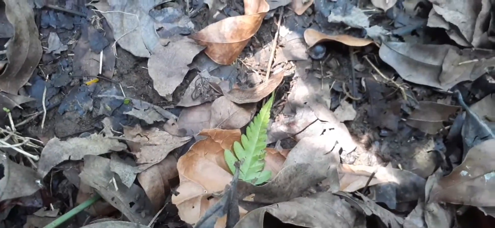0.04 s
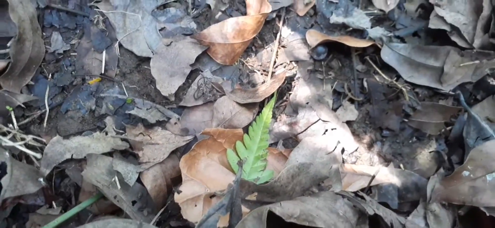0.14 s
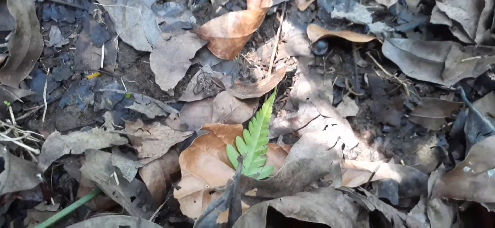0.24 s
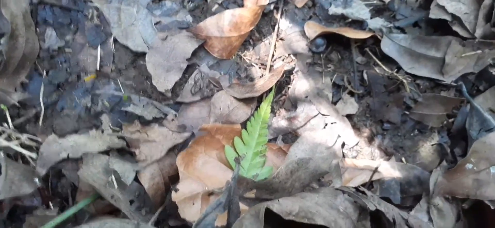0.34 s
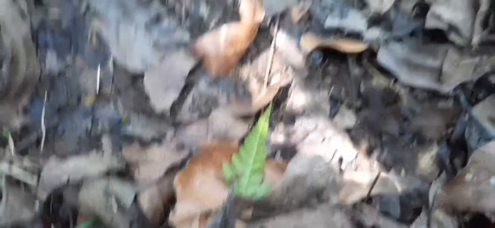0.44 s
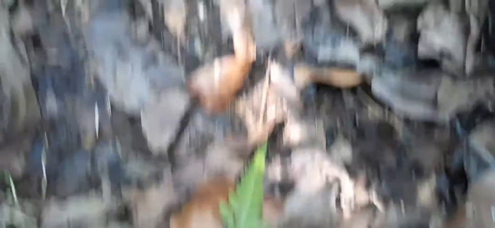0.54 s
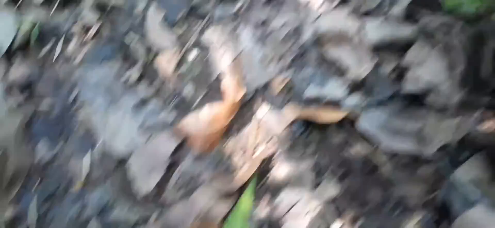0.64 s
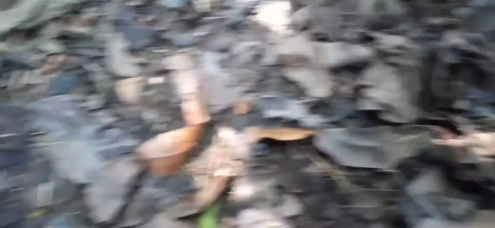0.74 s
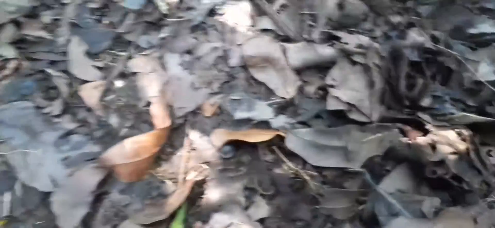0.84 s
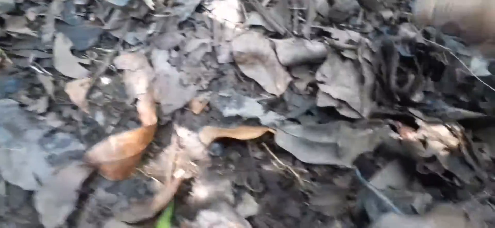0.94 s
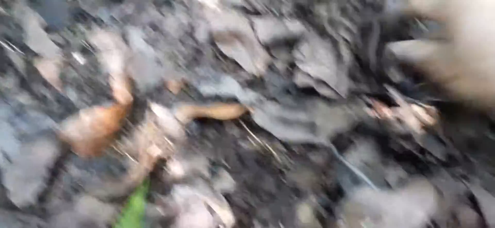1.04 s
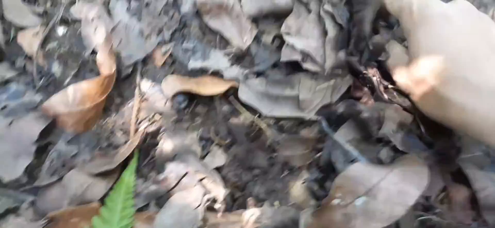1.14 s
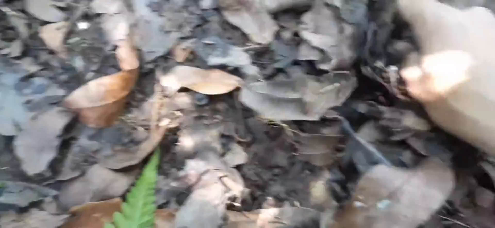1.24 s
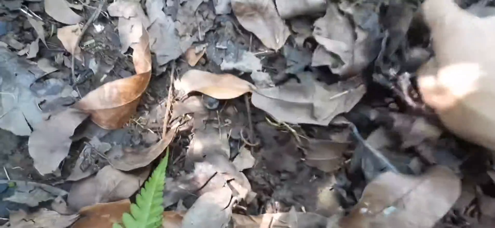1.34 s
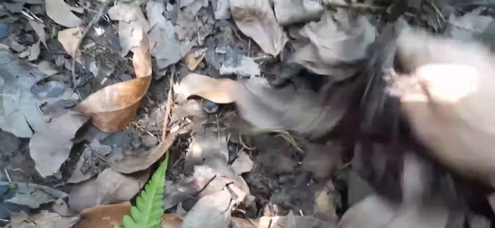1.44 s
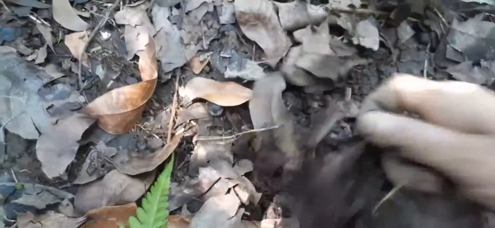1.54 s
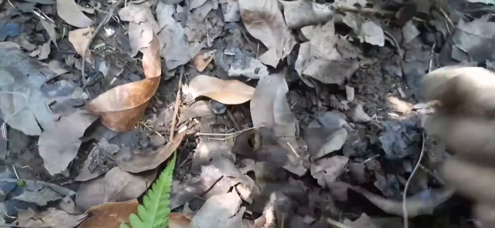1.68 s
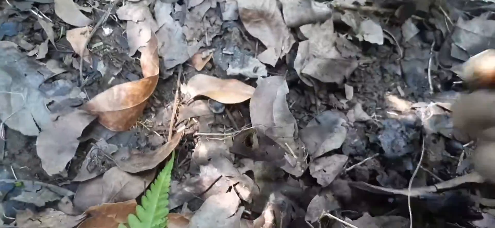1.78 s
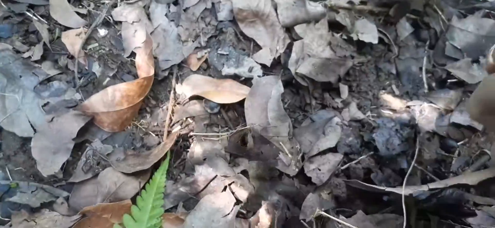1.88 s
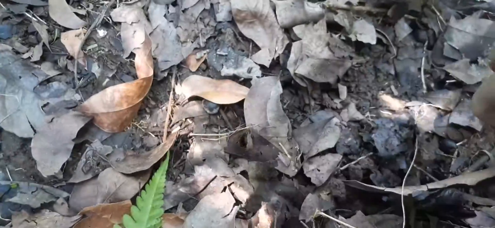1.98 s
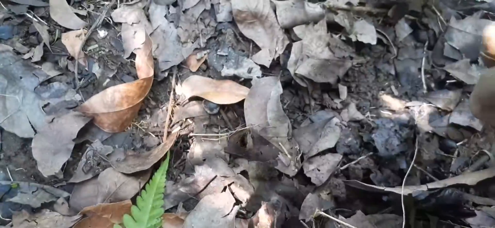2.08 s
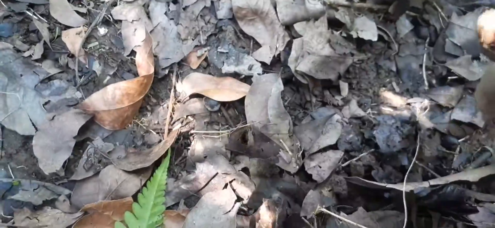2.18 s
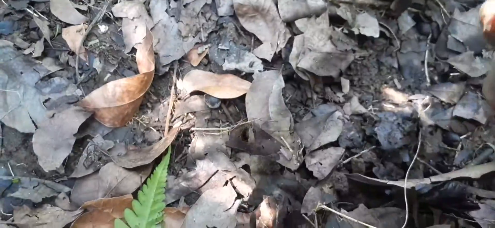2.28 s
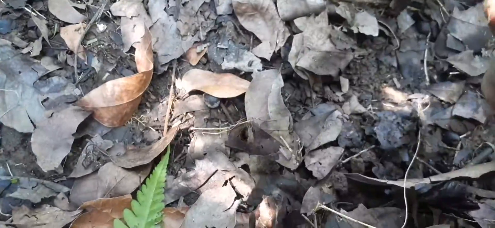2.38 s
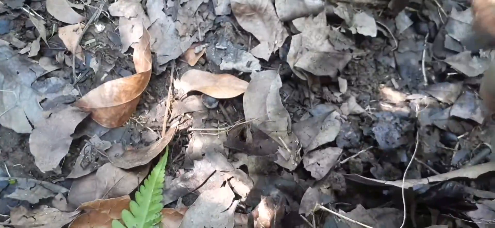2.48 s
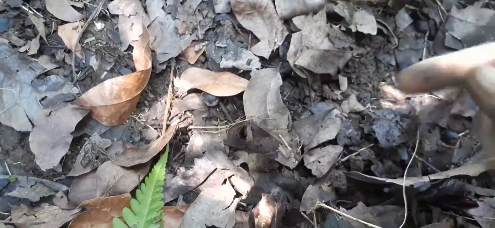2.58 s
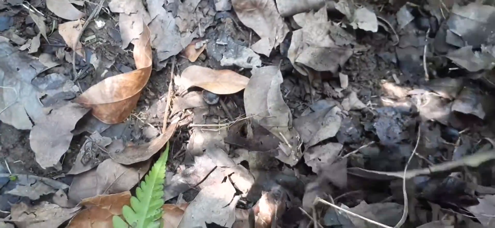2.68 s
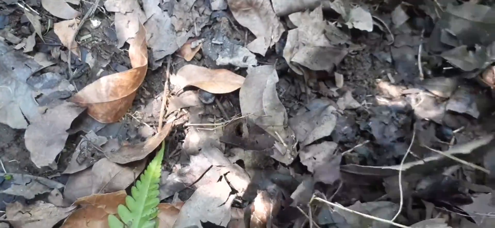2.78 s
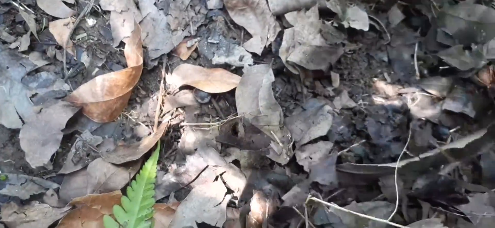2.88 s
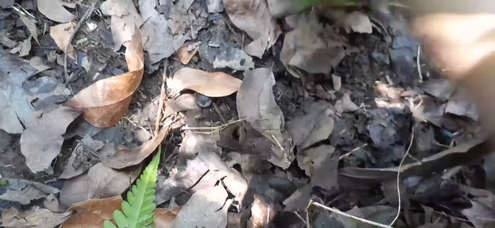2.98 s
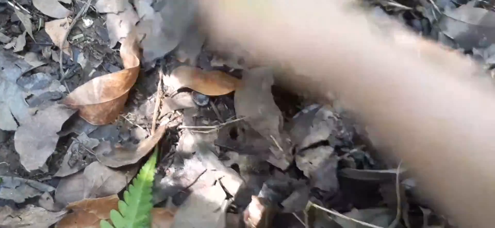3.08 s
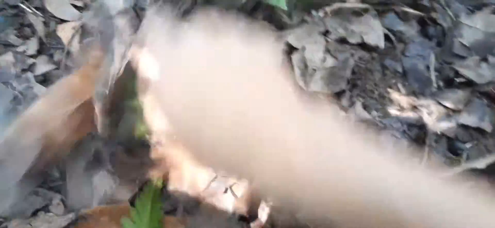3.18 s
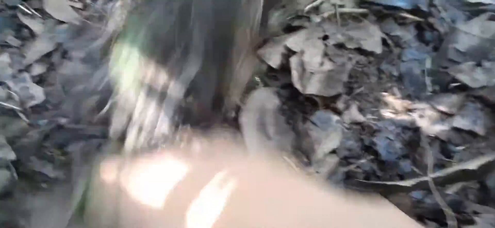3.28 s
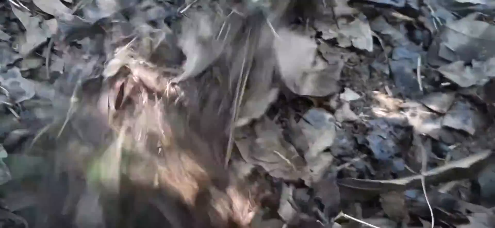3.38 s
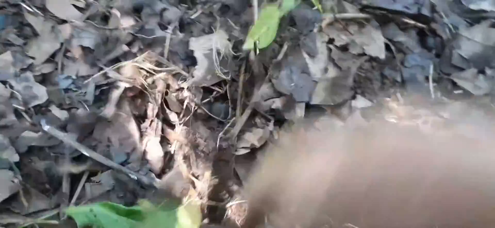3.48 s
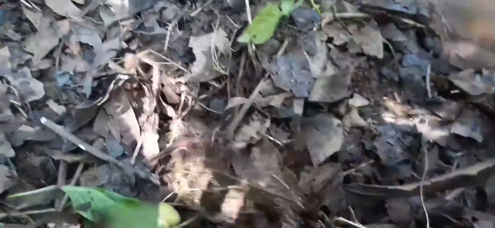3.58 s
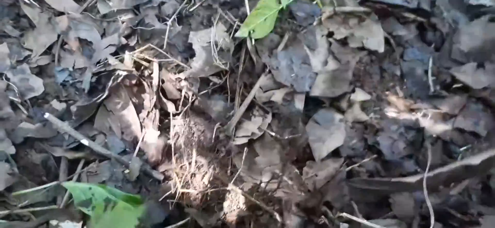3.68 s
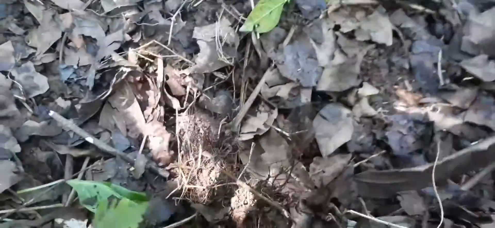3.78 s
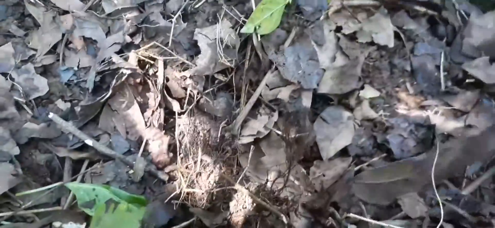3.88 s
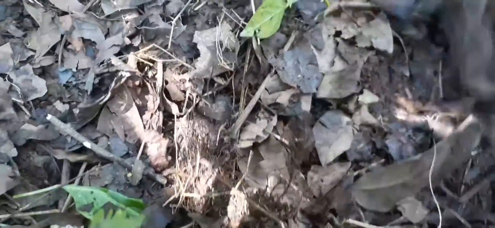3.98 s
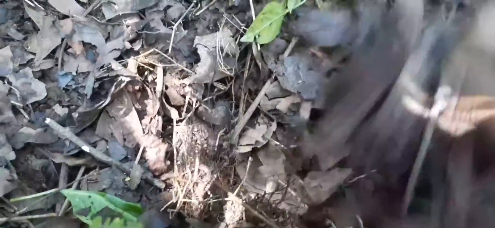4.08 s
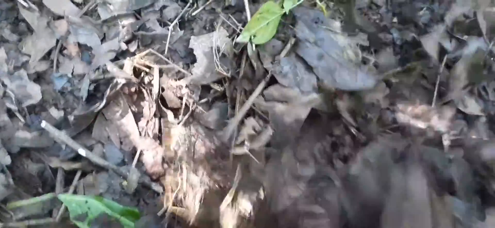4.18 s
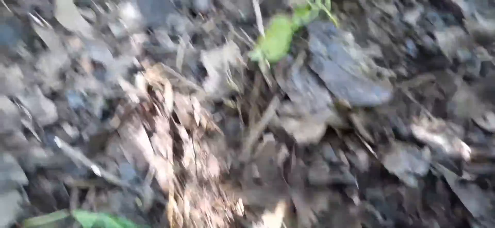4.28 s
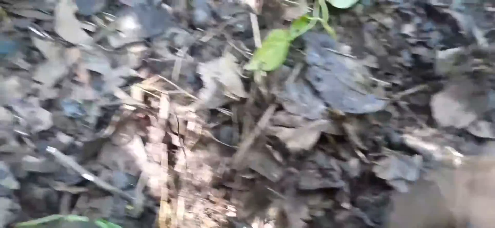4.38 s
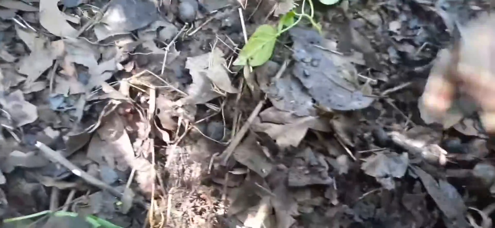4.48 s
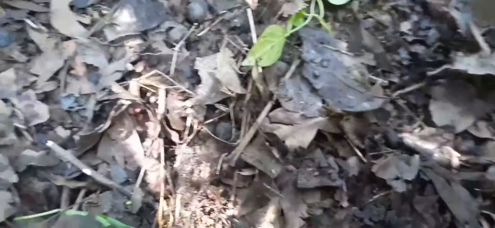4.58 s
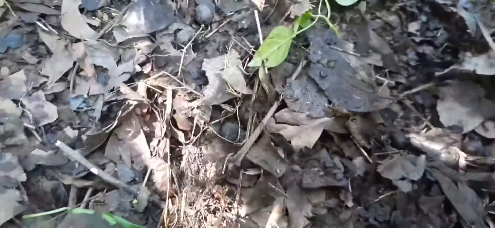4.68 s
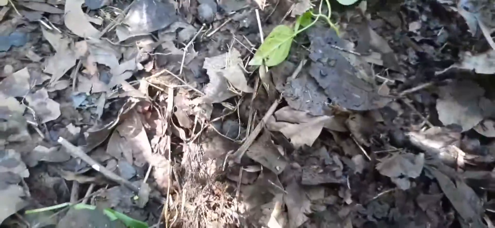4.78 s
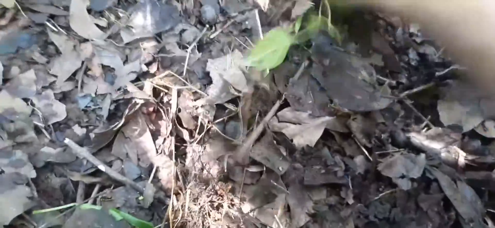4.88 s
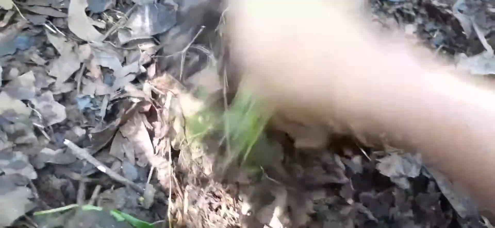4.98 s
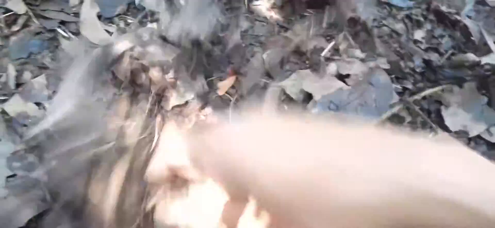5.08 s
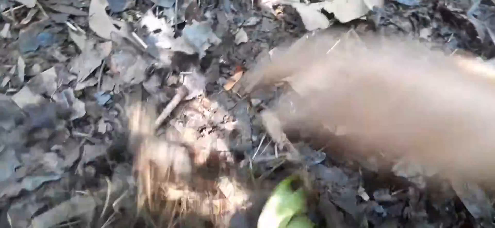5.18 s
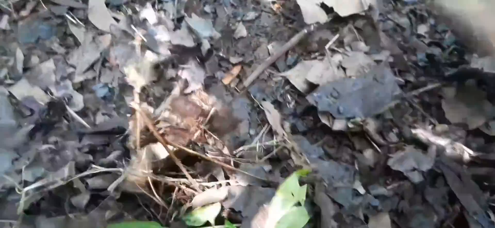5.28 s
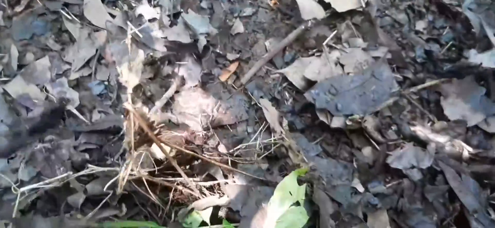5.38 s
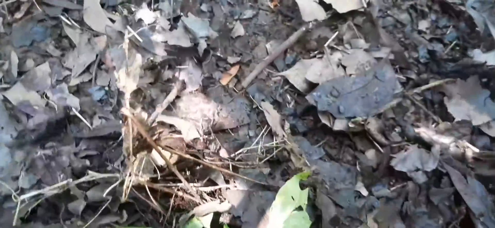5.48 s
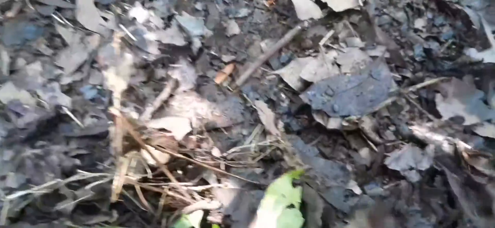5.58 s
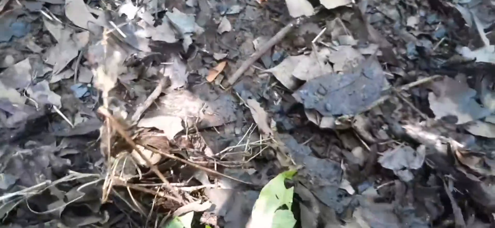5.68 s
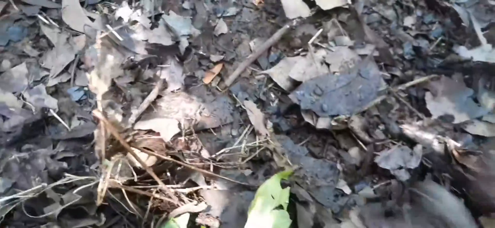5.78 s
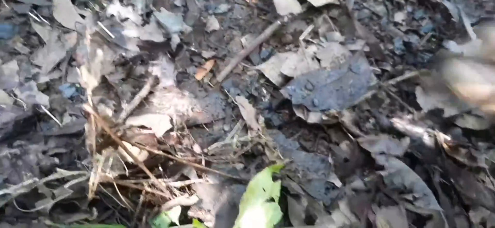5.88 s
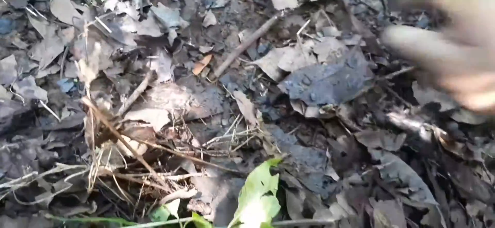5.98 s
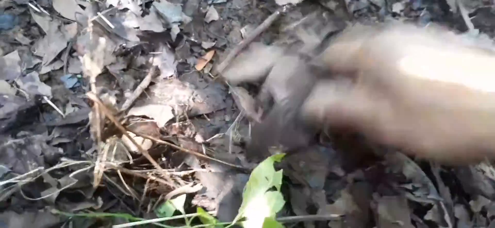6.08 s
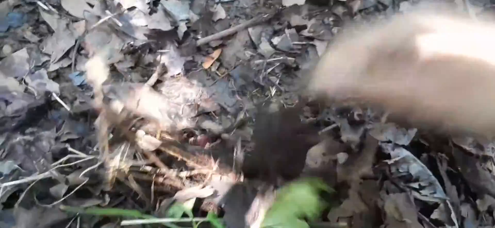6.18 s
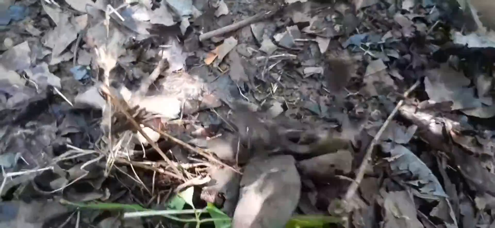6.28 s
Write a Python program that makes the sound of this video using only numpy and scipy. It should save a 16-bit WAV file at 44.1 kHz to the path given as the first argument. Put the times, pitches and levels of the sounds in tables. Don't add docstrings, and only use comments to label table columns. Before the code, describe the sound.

Outdoors, close in stereo, a hand works through dry leaf litter. A crackling stroke is already under way and stops around 0.2 s, with small leaf pops; a short light pull follows at 0.6 s and a soft slow one near 1.1 s. A harder crunching rake runs from 1.4 to 1.7 s, then a few ticks settle into near quiet. A brief touch clicks at 2.7 s. From about 3.0 to 3.6 s comes the loudest, deepest rake, dense crunch leaning left with a slight low air puff. Double strokes fill 3.8 to 4.4 s, with sharp snaps. After a lull, a sideways pull rustles at 4.9 to 5.2 s, a softer scrape at 5.5 to 5.9 s, and a final rummage starts with very sharp cracks at 6.1 s. Faint traffic rumble, a distant engine drone climbing later, and high insect hiss lie underneath.

```python
import sys
import numpy as np
from scipy import signal
from scipy.io import wavfile

SR = 44100
rng = np.random.default_rng(int(sys.argv[2]) if len(sys.argv) > 2 else 0)


def dump(signal):
    limited = np.clip(np.atleast_2d(signal).T, -1, 1)
    pcm = np.round(limited * 32767).astype(np.int16)
    wavfile.write(sys.argv[1], SR, pcm)


def ratio_of_db(decibels):
    return 10 ** (np.asarray(decibels, float) / 20)


N = 279572

# f/Hz, density/dB per Hz
AIR_SPECTRUM = [(25, -26), (45, -4), (80, -4), (130, -6.5), (220, -11.5), (300, -23.5), (420, -30),
                (1000, -38), (2500, -38.5), (5000, -42), (8000, -47), (13000, -38), (16000, -44)]
AIR_DB = -66.5
# f/Hz, correlation/1
AIR_LIKENESS = [(60, 0.97), (300, 0.56), (2500, .03)]
# t/s, level/dB
TRAFFIC = [(0, -0.5), (1.4, 0.5), (1.9, -2), (2.4, -5.5), (2.8, -1), (3.3, 2), (3.75, -6.5), (4.2, 3.5),
           (4.7, -6), (5.1, 2), (6.3, 3.5)]
# t/s, firing f/Hz, level/dB
ENGINE_SWELLS = [
    [(0.0, 52.3, -69), (0.36, 51.4, -67), (0.51, 55.7, -97), (0.59, 53.8, -67), (0.9, 54.66, -80),
     (1.68, 50, -62), (2.0, 51.4, -73)],
    [(2.0, 61.3, -67), (2.188, 64.9, -69), (2.334, 58.5, -91), (2.534, 61.2, -56.5), (2.8, 54.4, -84)],
    [(3.5, 57.8, -72), (3.84, 57.73, -57.5), (4.96, 58.8, -61), (5.15, 58.5, -51.5), (5.34, 65.45, -67),
     (5.55, 62.1, -49.5), (5.96, 66.7, -54.5), (6.06, 61.1, -62), (6.2, 65.2, -52.5)],
]
# multiple/1, level/dB
ENGINE_ORDERS = [(1, 3.5), (2, -14), (3, -16.5)]
INSECT_HZ, INSECT_DB = (8830, 11150), -68

# peak t/s, crackle level/dB, 10 dB rise/ms, 10 dB fall/ms, left over right/dB
STROKES = [(0.167, -43.5, 308, 23, -5.5), (0.619, -44.5, 26, 60, 0), (0.679, -44.5, 94, 24.5, -0.5),
           (1.136, -45, 89, 143, 1.5), (1.431, -40.5, 20.5, 66, 3), (1.52, -32, 88.5, 86, 1),
           (1.681, -42.5, 150, 85, 2), (2.714, -42, 6, 12.5, 4), (3.131, -26.5, 102, 205, 6.5),
           (3.36, -27.5, 193, 118, 9), (3.521, -43, 98, 58, 5.5), (3.844, -34.5, 17, 176, 0.5),
           (3.982, -35, 196, 76, 0), (4.13, -32, 49, 190, 1.5), (4.266, -32, 206, 42, 5.5),
           (4.892, -36, 41, 288.5, 3.5), (5.058, -28.5, 110, 66, 9.5), (5.153, -41, 43, 89, 8.5),
           (5.493, -36, 56.5, 309, -6), (5.68, -34.5, 292, 45, 2), (5.86, -52, 57, 115, 8),
           (6.072, -41.5, 1, 104, 0), (6.121, -36, 47.5, 54, 14), (6.164, -34, 58, 22, 5.5)]
# peak t/s, crackle level/dB, 10 dB rise/ms, 10 dB fall/ms, left over right/dB
TOUCHES = [(0.17, -59, 27, 76, -4.5), (0.38, -60.5, 158, 90, 1.5), (0.558, -53.5, 16, 95, -1),
           (0.79, -54.5, 194, 94, 6.5), (1.027, -61, 24.5, 119, 3.5), (1.8, -59, 35, 176, 12),
           (1.3, -69, 60, 149.5, 3), (3, -63, 25, 74, 3), (1.31, -60, 50, 77, -2),
           (4.55, -62.5, 83, 92, 2.5), (4.37, -52.5, 80, 90, 4), (6.03, -82, 100, 104, 3),
           (3.63, -61, 47, 48.5, 11), (4.7, -63.5, 200, 197, 5), (2.95, -53, 21, 62, 1),
           (2.775, -60.5, 40, 68, 3), (3.72, -54.5, 144, 200, 5), (4.815, -47, 23, 204, 3),
           (6.7, -42.5, 16, 40, -5.5), (5.36, -53, 63, 93, 14), (5.937, -51.5, 78, 16, 6.5),
           (6.231, -56, 2, 157, 12), (6.306, -55.5, 12, 58.5, 10.5)]
REST_DB = -80
# landing t/s, lifting t/s
CONTACTS = [
    (-0.1, 0.18),
    (0.61, 0.73),
    (1.04, 1.221),
    (1.392, 1.725),
    (2.691, 2.705),
    (2.975, 3.646),
    (3.824, 4.46),
    (4.861, 5.28),
    (5.428, 6.005),
    (6.07, 6.92),
]
LAND_MS, LIFT_MS = 13, 50
# t/s, level/dB
PRESS = [(0.17, 5.5), (0.4, -15), (0.68, 4.5), (1.14, -2.5), (1.43, -5), (1.72, 3), (2.72, 5), (2.95, -0.5),
         (3.22, -1), (3.4, 5.5), (3.62, 4), (3.78, -2), (3.98, 2.5), (4.22, 4), (4.87, -1.5), (5.12, -1.5),
         (5.75, 1), (6.12, -3)]
# t/s, hollow resonance f/Hz, depth in the litter/dB
HOLLOW = [(0.1, 2180, 13.5), (0.48, 2370, 8.5), (0.65, 2080, -3), (1.14, 2110, 4.5), (1.6, 1810, 7.5),
          (2.17, 2070, -1), (2.7, 1930, 17), (2.95, 2270, 7), (3.2, 2230, -3.5), (3.57, 2670, 3.5),
          (3.9, 1620, -3.5), (4.2, 1950, 6), (4.98, 2750, -3.5), (5.2, 2390, -0.5), (5.51, 1740, 0),
          (5.85, 1680, 8), (6.1, 2290, 2.5), (6.34, 2574, 0.5)]
SHADE_RATIO, SHADE_DB, SHADE_WIDTH = 1.47, -0.87, 0.16
# t/s, gain of the finest crackle/dB
FACING = [(0.1, 1), (0.45, -0.5), (0.68, 0.5), (1.14, -1), (1.5, 0.5), (1.7, 0), (2.72, 1), (3.0, 1.5),
          (3.15, 3), (3.32, 0.5), (3.5, -2), (3.9, -1), (4.2, 0.5), (4.9, -0.5), (5.05, 1), (5.5, -1.5),
          (5.8, 1), (6.14, -0.5)]
RASP_HIDDEN = 0.55
DIG_S = 0.056
# at a medium pull/dB, then dB per dB of pull, of lateness, of depth
RASP, BODY, SOIL = (-6.5, 0.1642, 0.17, 0.3362), (-6.5, 0.09, 0.0566, 0.5543), (-20, 0.2041, 0.22, 0.6448)
# f/Hz, density/dB per Hz
LEAF_SPECTRUM = [(88, -39), (150, -20.5), (270, -15.5), (328, -24.5), (612, -26.5), (871, -8.5),
                 (1210, -0.5), (2100, -0.5), (2920, -3.5), (7320, -6), (10000, 1), (12900, -6.5),
                 (16000, -3.5)]
ZONE_HZ = [220, 900, 3000, 7000, 16500]
# f/Hz, extra left over right/dB
PORT_TILT = [(250, -3), (2000, 6), (4500, -3.5), (9000, 3)]

# t/s, peak level/dB, ring f/Hz, ring over peak/dB, left over right/dB
SNAPS = [(0.166, -23, 2550, -0.5, -11.5), (1.0778, -40.5, 2740, 2.5, -4), (1.5592, -23.5, 1700, -4, 14),
         (1.6516, -29, 2060, 6.5, -5.5), (1.6633, -27, 1630, -1, -4), (1.7262, -34, 2820, -4, -3),
         (1.7337, -31, 1950, -8, 3), (1.779, -43, 1530, 1.5, 10.5), (2.6923, -32.5, 1350, 8.5, 0),
         (2.706, -33.5, 2140, 4.5, 0.5), (2.714, -44, 2280, 6, 13), (3.1822, -18, 1900, -26, 18),
         (3.5114, -22.5, 2280, -4, 15), (3.5248, -36, 2030, 6, 5), (3.5807, -29.5, 1720, 1, 5.5),
         (3.6975, -34.5, 2210, -5.5, 4.5), (4.0793, -11, 2600, -11, -2.5), (4.4277, -34.5, 1410, 5.5, 3),
         (5.1644, -30.5, 2520, 4.5, 11), (5.2, -27.5, 2550, -0.5, 9), (6.1191, -7.5, 3600, -11, 8),
         (6.1373, -15.5, 3220, -6.5, 16), (6.1672, -26, 2720, -9, 15), (6.3028, -39.5, 2900, 3, 17.5)]
# t/s, peak level/dB, left over right/dB
TICKS = [(0.0315, -30, -7), (0.0343, -32, -3), (0.4105, -31, 2.5), (0.615, -38, -3), (0.7587, -46, 7),
         (0.8056, -49, 11), (0.858, -43, 1.5), (0.957, -41.5, 2), (1.3688, -38, -2.5), (1.423, -20.5, -6),
         (1.8846, -41.5, -7), (1.8887, -41, 4), (1.929, -43, 2), (1.9557, -38, 5.5), (2.688, -36, 1),
         (2.696, -44, 1), (3.8314, -18, 1.5), (3.844, -15.5, 2), (4.0715, -14.5, -5), (4.248, -19, 2),
         (4.4246, -37, 7), (4.5046, -45, 17), (5.184, -30, -3), (5.2549, -37.5, 22.5), (5.5847, -10, -1),
         (5.677, -21, 6), (5.966, -39, -17), (6.1243, -12, 6), (6.126, -13.5, 12), (6.3066, -32.5, -1)]
SPLINTER_HZ, SPLINTER_SPREAD, TICK_RING_HZ, TICK_RING_DB = 9960, 0.2, 2500, -41
# t/s, peak level/dB, left over right/dB
CRUNCHES = [(0.089, -19, 1), (0.133, -26, 1), (1.433, -18, 6), (1.4642, -13, 7.5), (1.5056, -15, 2),
            (1.516, -20, 9), (1.5305, -18, 0), (1.5583, -30, -3), (1.609, -19, 3), (1.622, -34, 9),
            (3.129, -6.5, 6.5), (3.139, -15, 10.5), (3.172, -15, 10), (3.219, -12, 14), (3.919, -29, -2),
            (4.114, -23, 9), (4.1503, -12, 5), (4.209, -8, 5.5), (4.271, -20, -6), (4.882, -29, 7),
            (4.8087, -40, 6), (2.9372, -36, 4), (1.2294, -41, 4), (5.9189, -27, 1), (5.5277, -20, 3),
            (5.619, -19, -1), (5.6793, -11.5, 0.5), (5.8286, -24, 0.5), (5.924, -34, -5),
            (6.1749, -23.5, 4.5)]
CRUNCH_DB, CRUNCH_RING_HZ, CRUNCH_RING_DB = -6, 2070, -5
# t/s, level/dB, f/Hz, left over right/dB
CHIPS = [(0.0364, -28, 7150, -7), (0.7593, -40, 8960, 7.0), (0.8062, -38, 9700, 13.0),
         (0.8311, -55, 13000, 10.0), (1.078, -40, 11070, 3), (1.314, -49, 8600, 7),
         (1.5295, -20, 8460, 4.5), (1.5859, -32, 9950, -1.0), (1.6014, -27, 11070, 3),
         (1.6113, -28, 8790, 5), (1.6293, -26.5, 8610, 2.5), (1.6961, -29.5, 9430, 6.5),
         (1.7206, -30, 8400, 10), (1.751, -39, 9560, 13), (3.072, -27, 12270, 13), (3.1164, -25, 8790, 12),
         (3.3823, -20, 9430, 13), (3.4946, -22, 12230, 10), (3.5684, -33, 7410, -4.5),
         (3.5873, -38, 8350, 12), (3.8912, -33, 11410, 2), (3.9201, -24, 11460, -1.5),
         (4.0219, -23, 14810, -7), (4.3067, -38, 8660, -3), (4.3641, -32, 11110, 10),
         (4.3711, -35, 12450, 8), (4.4244, -33, 10680, 10), (4.4703, -39.5, 9350, 17.5),
         (4.4908, -40, 10200, 6), (4.5048, -45, 9350, 13), (4.5177, -40, 10680, 13.0),
         (4.6898, -51, 8610, 2), (5.071, -20, 12620, 15), (5.1548, -29, 14860, 11),
         (5.1643, -31, 12320, 16), (5.1832, -29.5, 13260, 14.0), (5.3274, -43.5, 8220, 9),
         (5.3399, -45, 11200, 15.0), (5.4421, -42, 11670, -8), (5.6561, -20, 8040, 2),
         (5.9385, -38, 10030, -7), (5.95, -41, 11930, 7), (5.9649, -43.5, 11890, -7),
         (6.0961, -27, 8870, 11), (6.1755, -22, 10800, 15), (6.1839, -26, 9770, 16),
         (6.2478, -44, 11510, 18), (6.3346, -39, 10900, 16)]
# t/s, level/dB, f/Hz, left over right/dB
POPS = [(0.0817, -33, 2040, 3), (0.0953, -32, 2200, -1), (0.115, -40, 2140, 7.5), (0.1336, -31, 2330, 4),
        (0.1454, -31, 2360, -4), (0.1555, -30, 2180, 3), (4.883, -40, 1810, 2), (4.9302, -35, 2390, 5),
        (5.1496, -33, 2200, 16), (5.6241, -30, 1710, 2.5), (5.656, -33, 2070, 4.5),
        (5.6924, -34, 2200, 3.5)]
# t/s, level/dB, f/Hz, left
# over right/dB
SHORT_CHIPS = [(0.9557, -48, 10600, 2.5), (1.929, -36, 9990, 7.0), (2.5444, -53, 10200, -1),
               (2.8214, -57, 9490, 2.5), (4.882, -18, 9400, 13), (4.9894, -23, 8400, 10.0),
               (5.0114, -21, 9700, 10.5), (5.0994, -28, 10800, 8.0), (5.2734, -41, 10900, 9.0),
               (5.2914, -35, 12300, 8.5), (5.3104, -38, 12900, 2), (5.3544, -46, 10200, 6.0),
               (5.8037, -35, 11800, 1)]
# t/s, level/dB, f/Hz, left over right/dB
TAPS = [(1.4253, -27, 1760, 1.5), (1.5151, -25, 1890, -10), (1.7191, -38, 2760.0, 14),
        (1.7261, -31.5, 3110, 5.5), (1.751, -44, 2100, 6), (1.8837, -50.5, 2150.0, 11.0),
        (2.7722, -46.5, 2186, -3), (3.525, -28, 1980.0, 11), (3.7061, -42, 2930.0, 5),
        (3.8318, -31, 4420, -2), (4.4998, -43, 2280.0, 5.5), (4.5571, -50, 2630.0, 8),
        (4.5961, -51, 2480, 12), (5.2191, -38, 2070.0, 11), (5.2406, -37.5, 4070, 10.5),
        (5.2915, -43, 2240, 18), (5.3279, -41, 3440, 15.0), (5.3748, -47.5, 2210, 8),
        (5.5843, -23, 5010, -5), (5.5847, -30, 1497, -6), (4.4625, -47.5, 900, 0), (4.5005, -46, 1310, 5),
        (1.8045, -52, 1200, 4), (5.8293, -30, 4100, -7.5), (5.8577, -38.5, 1253, 3),
        (5.9215, -42, 2100, -7), (5.9385, -39, 1700, 8), (5.9649, -44, 4570.0, -1), (6.2483, -47, 1700, 16),
        (6.2563, -46, 2500.0, 12)]
# peak t/s, level/dB, 10 dB rise/ms, 10 dB fall/ms
PUFF = [
    (3.368, -42.5, 125, 71),
    (3.53, -56, 30, 62),
]
CUTOFF_HZ = 15750


def rms_one(x):
    return x / np.sqrt(np.mean(x ** 2) + 1e-20)


def in_time(rows):
    s, *columns = np.transpose(rows)
    return [np.interp(np.arange(N) / SR, s, column) for column in columns]


def at_hz(points, hz):
    point_hz, value = np.array(points)[:, 0], np.array(points)[:, 1]
    return np.interp(np.log(hz), np.log(point_hz), value)


def drift(rate):
    r = np.exp(-40 * np.pi * rate / SR)
    noise = rng.standard_normal(N // 20 + 4002)
    slow = signal.lfilter([1], [1, -2 * r, r * r], noise)[4000:]
    return np.interp(np.arange(N) / 20, np.arange(len(slow)), rms_one(slow))


def ring(clicks, hz, t60):
    r, w = ratio_of_db(-60 / (t60 * SR)), 2 * np.pi * hz / SR
    gain = np.sqrt((1 - r * r) / 2)
    return signal.lfilter([gain, 0, -gain], [1, -2 * r * np.cos(w), r * r], clicks + 1e-18)


def resonate(x, hz, cycles):
    r = np.exp(-np.pi * min(3.18 * hz / cycles, 6000) / SR)
    gain = (1 - r * r) / 2
    return signal.lfilter([gain, 0, -gain], [1, -2 * r * np.cos(2 * np.pi * hz / SR), r * r], x)


def swell(s, db, rise_ms, fall_ms):
    ms = 1000 * (np.arange(N) / SR - s)
    tens_down = np.maximum(-ms / max(rise_ms, 2), ms / max(fall_ms, 2))
    return ratio_of_db(2 * (db - 10 * tens_down))


def air(patchy_db):
    out, edges = 0, 24 * 2 ** np.arange(0, 9.6, .5)
    white = rng.standard_normal((2, 2, N))
    for k, (low, high) in enumerate(zip(edges, edges[1:])):
        band = signal.butter(2, [low, high], "band", fs=SR, output="sos")
        mid, side = signal.sosfilt(band, white[k % 2])
        hz = np.sqrt(low * high)
        alike = np.clip(at_hz(AIR_LIKENESS, hz), -1, 1)
        traffic_db = in_time(TRAFFIC)[0] * (hz < 500)
        gain = ratio_of_db(at_hz(AIR_SPECTRUM, hz) + patchy_db * drift(7.2) + traffic_db)
        out = out + gain * (np.sqrt(1 + alike) * mid + np.sqrt(1 - alike) * side * [[1], [-1]])
    return ratio_of_db(AIR_DB + 4.5) * rms_one(out)


def gate(rows):
    start, end = rows[0][0], rows[-1][0]
    return np.interp(np.arange(N) / SR, [start - .05, start, end, end + .25], [0, 1, 1, 0])


def engine(lead_rad):
    out = 0
    for rows in ENGINE_SWELLS:
        hz, level_db = in_time(rows)
        phase = 2 * np.pi * np.cumsum(hz + 0.32 * drift(7.1)) / SR + lead_rad * np.array([[1], [-1]])
        orders = sum(ratio_of_db(db + 2.0 * drift(3.9)) * np.sin(k * phase) for k, db in ENGINE_ORDERS)
        out = out + gate(rows) * ratio_of_db(level_db + 2.5) * orders
    return out * ratio_of_db(np.array([[-.6], [.6]]))


def insects():
    band = signal.butter(3, INSECT_HZ, "band", fs=SR, output="sos")
    level = ratio_of_db(INSECT_DB + 0.74 * drift(0.59))
    return level * rms_one(signal.sosfilt(band, rng.standard_normal((2, N))))


def contact():
    t = np.arange(N) / SR
    away = [np.maximum(np.maximum((land - t) / LAND_MS, (t - lift) / LIFT_MS), 0) for land, lift in CONTACTS]
    return ratio_of_db(-20000 * np.min(away, axis=0))


def hand():
    rows = STROKES + TOUCHES
    down = contact()
    powers = [down * swell(*row[:4]) for row in STROKES] + [swell(*row[:4]) for row in TOUCHES]
    total = sum(powers) + ratio_of_db(2 * REST_DB)
    pan_db = sum(power * row[4] for power, row in zip(powers, rows)) / total
    r = np.exp(-1 / (DIG_S * SR))
    recent = signal.lfilter([1 - r], [1, -r], total, zi=[total[0]])[0]
    late_db = np.clip(10 * np.log10(recent / total), -12.0, 8.0)
    crisp_db, depth_db = 10 * np.log10(total), in_time(HOLLOW)[1]
    rasp_db, body_db, soil_db = [a + b * (crisp_db + 45) + c * late_db + d * depth_db
                                 for a, b, c, d in (RASP, BODY, SOIL)]
    return crisp_db, rasp_db, body_db, soil_db + in_time(PRESS)[0], pan_db


def both_ports(at, size, pan_db, lag):
    out = np.zeros((2, N))
    np.add.at(out[0], np.clip(at + lag, 0, N - 1), size * ratio_of_db(pan_db / 2))
    np.add.at(out[1], at, size * ratio_of_db(-pan_db / 2))
    return out


def crackle(slow_rate, rate_slope, size_db, clump_db, patch_db, hollow_db, cycles, pan_share,
            centre_lag, lead_per_db, lag_spread, scatter_db, apart_db):
    crisp_db, rasp_db, body_db, soil_db, pan_db = hand()
    per_s = slow_rate * ratio_of_db(rate_slope * (crisp_db + 60.0))
    surge = drift(30.0) + 0.88 * drift(62)
    clumps, facing_db = ratio_of_db(clump_db * surge), in_time(FACING)[0]
    at = np.flatnonzero(rng.random(N) < per_s / SR)
    draw = rng.random((N, 7))[at]
    size = ratio_of_db(size_db * np.minimum(-np.log(draw[:, 0] + 1e-9), 4.4)) * np.sign(draw[:, 1] - .5)
    size = size / np.sqrt(np.mean(size ** 2) * np.mean(clumps ** 2) * per_s[at] / SR) * clumps[at]
    place = 2 * draw[:, 2] - 1
    hollow_hz, depth_db = np.array(in_time(HOLLOW))[:, at]
    lag = np.round(centre_lag - lead_per_db * pan_db[at] - lag_spread * place).astype(int)
    zones_db = [soil_db, body_db, rasp_db - RASP_HIDDEN * facing_db, facing_db]
    out = 0
    for zone, over_db in enumerate(zones_db):
        over_db = over_db + apart_db * np.roll(surge, N // 5 * (zone + 1))
        pitches = np.geomspace(ZONE_HZ[zone], ZONE_HZ[zone + 1], 15)[1::2]
        weights = ratio_of_db(at_hz(LEAF_SPECTRUM, pitches)) * np.sqrt(pitches)
        weights = weights / np.sqrt(np.mean(weights ** 2))
        dealt = (draw[:, 3 + zone] * len(pitches)).astype(int)
        for k, hz in enumerate(pitches):
            mine = dealt == k
            pan = pan_share[zone] * (pan_db[at] + scatter_db * place)[mine] + at_hz(PORT_TILT, hz)
            leaf_db = (crisp_db + over_db + patch_db * drift(8.0))[at[mine]]
            octave = np.log(hz / hollow_hz[mine])
            leaf_db = leaf_db + hollow_db * (np.exp(-(octave / 0.16) ** 2) - .4) * (zone == 1)
            shade = np.exp(-((octave - np.log(SHADE_RATIO)) / SHADE_WIDTH) ** 2)
            leaf_db = leaf_db + SHADE_DB * np.maximum(depth_db[mine], 0) * shade
            struck = size[mine] * ratio_of_db(leaf_db) / np.sqrt(np.cosh(pan * np.log(10) / 20))
            clicks = both_ports(at[mine], struck, pan, lag[mine])
            mode = resonate(ring(clicks, hz, cycles[zone] / hz), hz, cycles[zone])
            out = out + weights[k] * ratio_of_db(1.0) * mode
    return out


def snaps(crack_s, ring_s, tail_s, tail_db, crack_db, ring_db, ring_pan, lag_per_db):
    out, t = np.zeros((2, N + 900)), np.arange(600) / SR
    crack = t / crack_s * np.exp(1 - t / crack_s) + ratio_of_db(tail_db) * np.exp(-t / tail_s)
    thump = t / ring_s * np.exp(1 - t / ring_s)
    breaks = SNAPS + [(s, db, TICK_RING_HZ, TICK_RING_DB, pan) for s, db, pan in TICKS]
    breaks += [(s, db + CRUNCH_DB, CRUNCH_RING_HZ, CRUNCH_RING_DB, pan) for s, db, pan in CRUNCHES]
    noises = rng.standard_normal((len(breaks), 3, 600))
    for (s, peak_db, low_hz, rel_db, pan_db), noise in zip(breaks, noises):
        high_hz = SPLINTER_HZ * np.exp(SPLINTER_SPREAD * np.clip(noise[0, -1], -2, 2))
        burst = 0.2 * noise[0] + noise[1:]
        high = ring(burst * crack, high_hz, 6 / high_hz)
        low = ring(burst * thump, low_hz, 6 / low_hz)
        for side, sign in enumerate([1, -1]):
            at = max(round((s - .0004) * SR - sign * lag_per_db * pan_db / 2), 0)
            splinter = high[side] / np.abs(high[side]).max()
            leaf = low[side] / np.abs(low[side]).max()
            out[side, at:at + 600] += ratio_of_db(peak_db + crack_db + sign * pan_db / 2) * splinter
            out[side, at:at + 600] += ratio_of_db(peak_db + ring_db + rel_db + sign * ring_pan * pan_db / 2) * leaf
    return out[:, :N]


def flecks(rows, rise_s, cycles, gain_db, lag_per_db):
    out, t = np.zeros((2, N + 900)), np.arange(400) / SR
    shape = t / rise_s * np.exp(1 - t / rise_s)
    for (s, db, hz, pan_db), noise in zip(rows, rng.standard_normal((len(rows), 3, 400))):
        burst = ring((0.91 * noise[0] + noise[1:]) * shape, hz, cycles / hz)
        level_db = db + gain_db - 10 * np.log10(np.cosh(pan_db * np.log(10) / 20))
        for side, sign in enumerate([1, -1]):
            at = max(round((s - rise_s) * SR - sign * lag_per_db * pan_db / 2), 0)
            out[side, at:at + 400] += ratio_of_db(level_db + sign * pan_db / 2) * burst[side] / np.abs(burst[side]).max()
    return out[:, :N]


def chips():
    return flecks(CHIPS, rise_s=0.00025, cycles=16.0, gain_db=3.5, lag_per_db=2.0)


def pops():
    return flecks(POPS, rise_s=0.00117, cycles=48.0, gain_db=-0.5, lag_per_db=1.0)


def short_chips():
    return flecks(SHORT_CHIPS, rise_s=0.00024, cycles=10.0, gain_db=-4.0, lag_per_db=-1.0)


def taps():
    return flecks(TAPS, rise_s=0.000816, cycles=14.0, gain_db=2.0, lag_per_db=1.5)


def puff():
    band = signal.butter(2, [45, 190], "band", fs=SR, output="sos")
    lumps = ratio_of_db(2.0 * np.array([drift(54), drift(31)]))
    wind = rms_one(signal.sosfilt(band, lumps * rng.standard_normal((2, N))))
    return np.sqrt(sum(swell(*row) for row in PUFF)) * wind


def scene():
    leaves = crackle(slow_rate=6000, rate_slope=.28, size_db=2.5, clump_db=1.15, patch_db=2.5, hollow_db=9.5,
                     cycles=[2.6, 4.8, 9.1, 9.2], pan_share=[0.65, 1.0, 0.49, 1.8], centre_lag=3.3,
                     lead_per_db=2.1, lag_spread=8.0, scatter_db=10.5, apart_db=0.38)
    breaks = snaps(crack_s=0.00012, ring_s=0.00095, tail_s=0.0024, tail_db=-1.0, crack_db=0.0,
                   ring_db=-0.5, ring_pan=0.64, lag_per_db=2.0)
    around = engine(lead_rad=0.032) + insects() + puff() + air(patchy_db=2.1)
    return ratio_of_db(1.0) * leaves + breaks + chips() + taps() + pops() + short_chips() + around


def top_cut(x):
    return signal.sosfilt(signal.butter(12, 16970, fs=SR, output="sos"), x)


def record(dry):
    x = signal.sosfilt(signal.butter(2, 35, "high", fs=SR, output="sos"), dry)
    x = signal.sosfilt(signal.ellip(12, .5, 75, CUTOFF_HZ, fs=SR, output="sos"), x)
    return top_cut(x)


dry = scene()
out = record(dry)
dump(out)
```